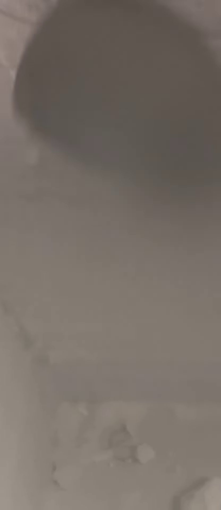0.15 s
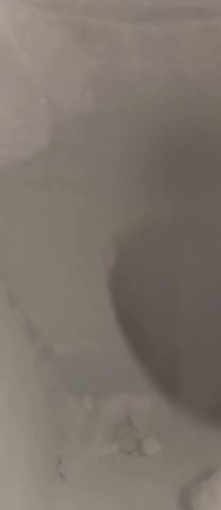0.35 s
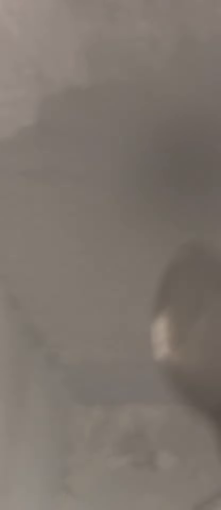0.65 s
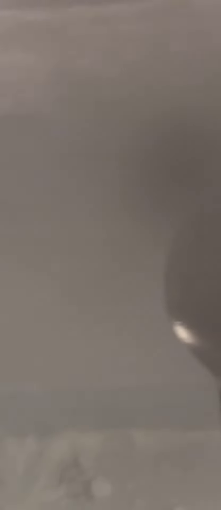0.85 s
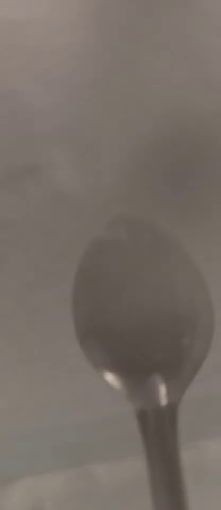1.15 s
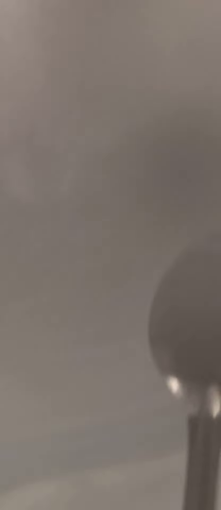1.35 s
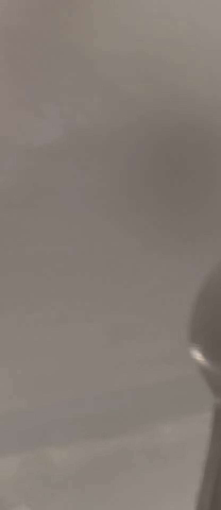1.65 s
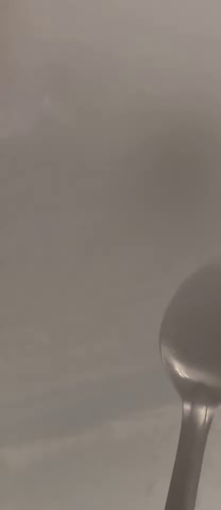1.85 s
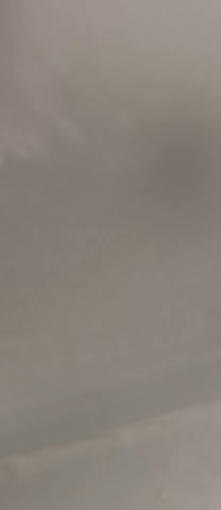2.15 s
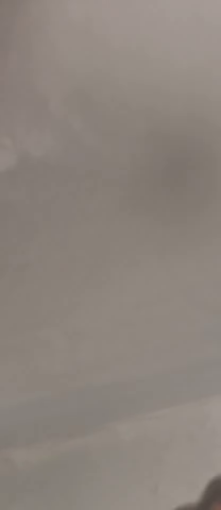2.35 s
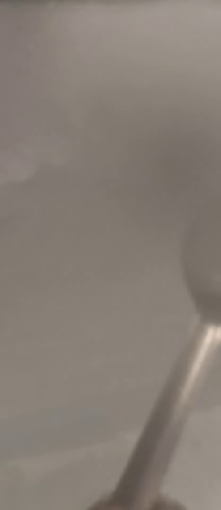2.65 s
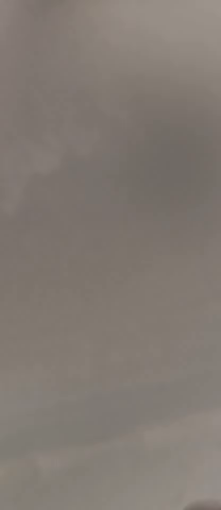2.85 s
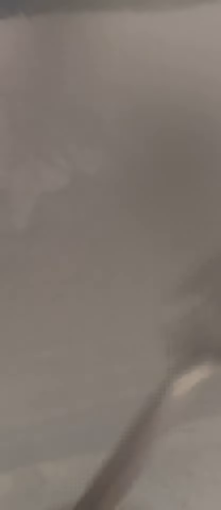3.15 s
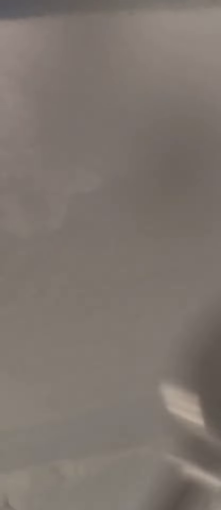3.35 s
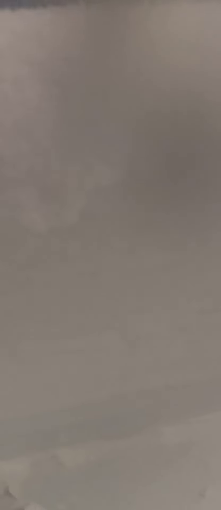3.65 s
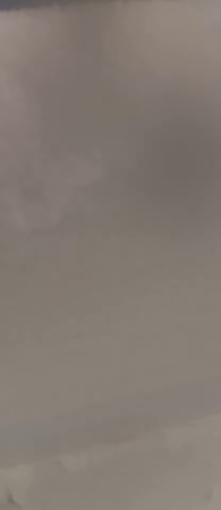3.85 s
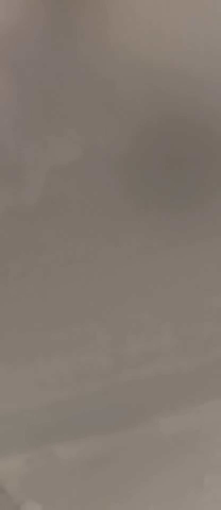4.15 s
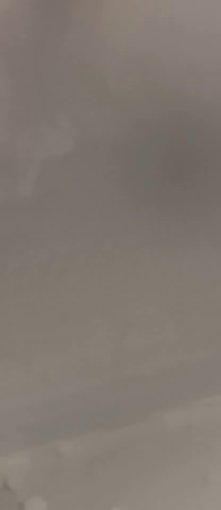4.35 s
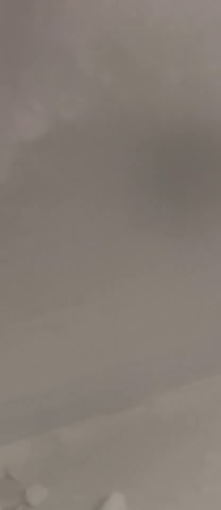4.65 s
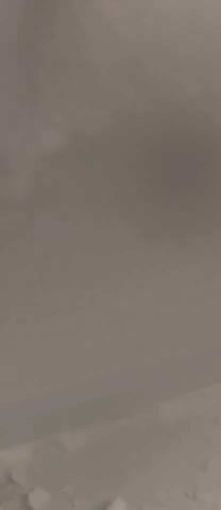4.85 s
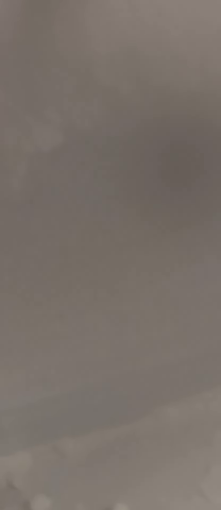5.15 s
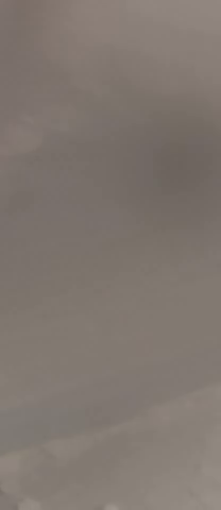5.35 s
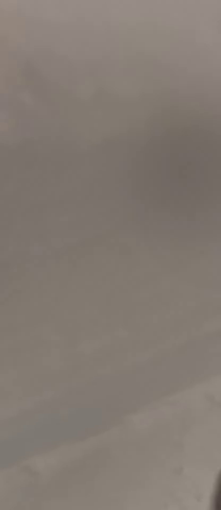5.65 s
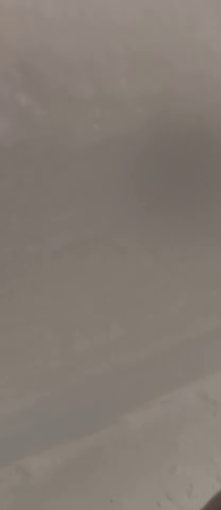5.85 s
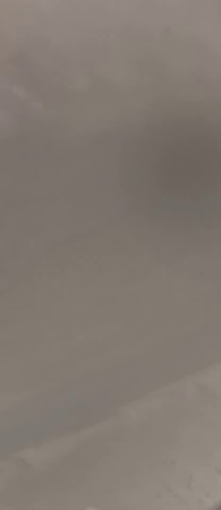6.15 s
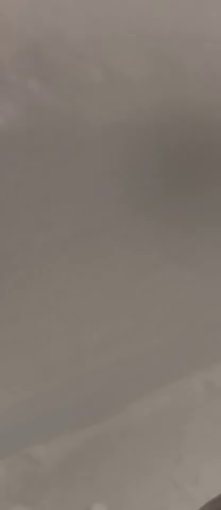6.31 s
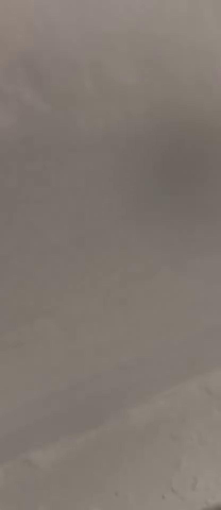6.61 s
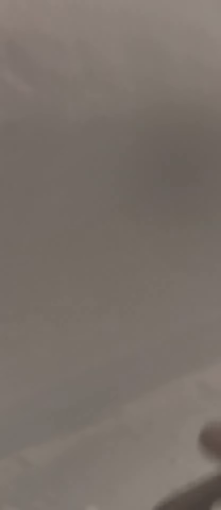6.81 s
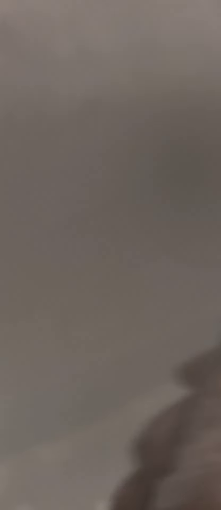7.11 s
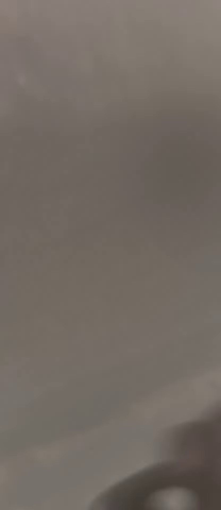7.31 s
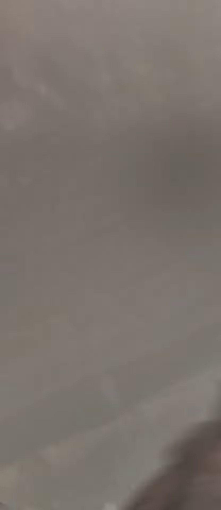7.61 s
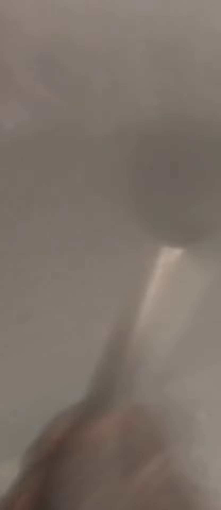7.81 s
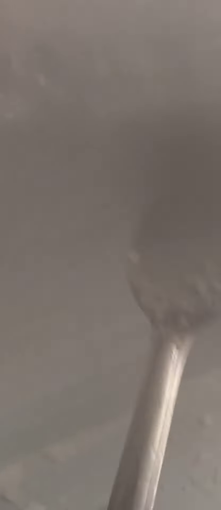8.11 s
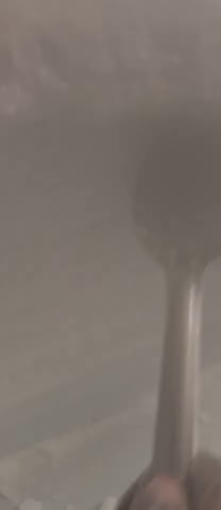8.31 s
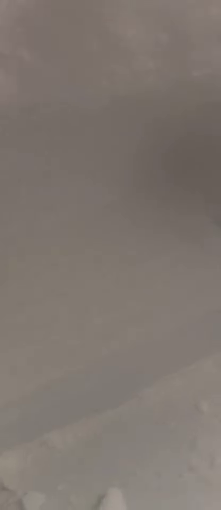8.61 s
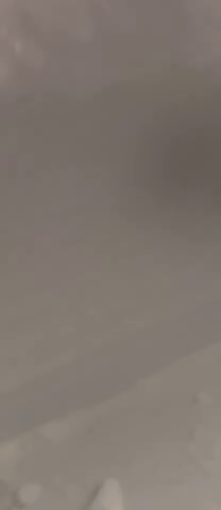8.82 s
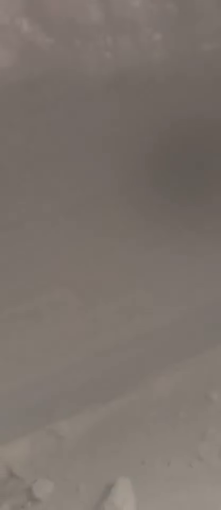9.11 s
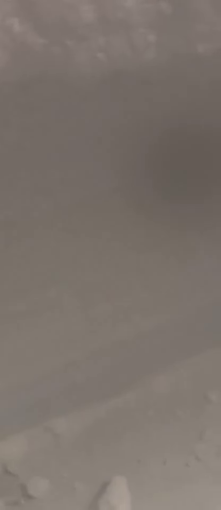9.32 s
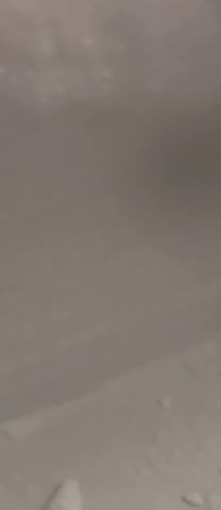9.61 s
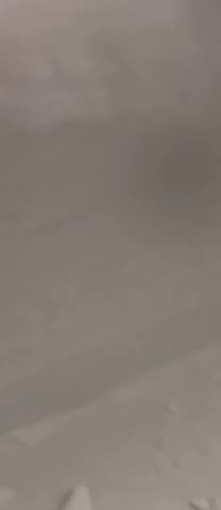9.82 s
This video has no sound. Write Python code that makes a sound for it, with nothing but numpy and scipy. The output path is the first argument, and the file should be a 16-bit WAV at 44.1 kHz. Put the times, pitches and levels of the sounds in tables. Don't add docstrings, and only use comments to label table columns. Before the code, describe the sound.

A metal spoon chops and scrapes thick frost inside a humming freezer, with boomy knocks, brittle ice crunches and thin singing rasps.

```python
import sys
import numpy as np
from scipy import signal
from scipy.fft import rfft, irfft, next_fast_len
from scipy.io import wavfile
from scipy.ndimage import uniform_filter1d

SR = 44100
rng = np.random.default_rng(int(sys.argv[2]) if len(sys.argv) > 2 else 0)


def undo_db(level):
    steps = np.asarray(level, float) / 20
    return 10 ** steps


def digitize_waveform(pressure):
    field = np.atleast_2d(pressure).T
    bounded = np.clip(field, -1, 1)
    quanta = np.round(bounded * 32767).astype(np.int16)
    wavfile.write(sys.argv[1], SR, quanta)


N = 439677

# (frequency [Hz], likeness [0-1])
LIKENESS = [(60, 0.96), (130, 0.94), (290, 0.89), (640, 0.07), (1410, 0), (3100, 0.11), (6820, 0),
            (15000, 0.03)]
# (frequency [Hz], level [dB], t60 [s])
CABINET = [(73.6, 1, 0.39), (110.6, 7, 0.36), (162.6, -1, 1), (179.2, -1, 0.77), (235, -11, 0.75),
           (260.4, 0.5, 0.74), (289, 7, 0.46), (350, -7, 1), (364.8, -15.5, 0.28), (464.6, -15.5, 0.42),
           (519, -17, 0.28), (612, -9.5, 0.13), (698, -21, 0.81), (965, -14.5, 0.11), (1310, 10.5, 0.039)]
# (frequency [Hz], width [Hz], level [dB])
SPOON = [
    [(3810, 38, 0)],
    [(5235, 30, 0), (7620, 45, -4), (8820, 50, -6), (10860, 80, -4), (12000, 70, -10), (13400, 55, -9)],
    [(6125, 50, 0.5), (8265, 110, -6), (10800, 70, -7), (12700, 120, -13), (14100, 60, -11)],
]


def level(x, db):
    return x * undo_db(db) / np.sqrt(np.mean(x ** 2))


def on_log(hz, table):
    f, v = np.transpose(table)[:2]
    return np.interp(np.log(np.maximum(hz, 1)), np.log(f), v)


def shaped(x, gain):
    size = next_fast_len(x.shape[-1])
    hz = np.arange(size // 2 + 1) * SR / size
    return irfft(rfft(x, size) * gain(hz), size)[..., :x.shape[-1]]


def hump(hz, octaves):
    return lambda f: np.exp(-.5 * (np.log2(np.maximum(f, 1) / hz) / octaves) ** 2)


def ring(x, hz, t60):
    r = np.exp(-np.log(1000) / (max(t60, .005) * SR))
    w = 2 * np.pi * hz / SR
    return signal.lfilter([.5, 0, -.5], [1, -2 * r * np.cos(w), r * r], x)


def walk(rate):
    hold = int(SR / rate)
    steps = np.repeat(rng.standard_normal(N // hold + 1), hold)
    return 1.38 * uniform_filter1d(uniform_filter1d(steps, hold), hold)[:N]


def pair(likeness):
    mid, side = rng.standard_normal((2, N))
    mid = shaped(mid, lambda f: np.sqrt(1 + np.clip(on_log(f, likeness), 0, 1)))
    side = shaped(side, lambda f: np.sqrt(1 - np.clip(on_log(f, likeness), 0, 1)))
    return np.array([mid + side, mid - side]) / np.sqrt(2)


def grit(scatter_db):
    grain_size = np.repeat(rng.exponential(size=N // 40 + 1), 40)[:N]
    return level(undo_db(scatter_db * grain_size) * rng.standard_normal((2, N)), 0)


def add(out, part, s):
    i = int(s * SR)
    out[:, i:i + part.shape[1]] += part[:, :N - i]


def freezer():
    # (time [s], level [dB])
    hum_gain = [(0.0, -33), (2.36, -30.5), (2.55, -34.5), (2.94, -36.5), (3.05, -36), (3.27, -43),
                (3.97, -43.5), (4.3, -41.5), (4.5, -36.5), (5.41, -37.5), (5.89, -33.5), (6.08, -40),
                (6.78, -41), (7.33, -38), (8.63, -37.5), (9.97, -31)]
    # (frequency [Hz], level [dB], wobble [dB], left minus right [dB])
    tones = [(59.9, -36, 5, -3.5), (102, -27.5, 0, 1.5), (113.2, -28, 1, -1), (202.4, -44.5, 3, 22),
             (226.2, -22.5, 0.53, 1.1), (298, -43.5, -1.5, -23), (339.7, -34.5, 1.5, -4),
             (556.5, -48.5, 4, 15), (709.5, -44.5, 4, 8.5), (775, -46, 2.5, 6), (831, -46, -1, 2.5)]
    # (frequency [Hz], density [dB per Hz])
    air_curve = [(15, -37), (25, -11.5), (102, -5.5), (141, -12.5), (190, -15.5), (223, -5.5), (256, -12),
                 (344, -11.5), (394, -14), (1330, -21), (1700, -23), (7710, -38.5), (9840, -42),
                 (13600, -43), (16000, -41)]
    # (frequency [Hz], width [Hz], level [dB])
    whines = [(5100, 40, -62), (7800, 50, -62), (13600, 70, -61), (15000, 70, -65)]
    t = np.arange(N) / SR
    air = pair(LIKENESS)
    out = level(shaped(air, lambda f: undo_db(on_log(f, air_curve))), -23) * undo_db(0.33 * walk(7.5))
    cavity = sum(undo_db(db) * ring(air, hz, t60) for hz, db, t60 in CABINET)
    out += level(cavity, -33)
    for hz, width, db in whines:
        out += level(ring(air, hz, 1.5 / width), db) * undo_db(3.5 * walk(3))
    for hz, db, wobble_db, pan_db in tones:
        phase = 2 * np.pi * (hz * t + rng.random()) + 0.3 * wobble_db * walk(3)
        sides_db = np.array([[pan_db], [-pan_db]]) / 2
        out += np.sqrt(2) * undo_db(db + wobble_db * walk(5) + sides_db) * np.sin(phase)
    s, db = np.transpose(hum_gain)
    return out * undo_db(np.interp(t, s, db) + 32.5)


def walls(x):
    # (first echoes [s], share [ratio], tail t60 [s], tail level [dB])
    echoes = (.004, 1.75, 0.37, -23)
    spread_s, share, t60, tail_db = echoes
    t = np.arange(int(.3 * SR)) / SR
    tail = shaped(rng.standard_normal((2, len(t))), hump(2500, 1.9)) / np.sqrt(SR / 100)
    reply = undo_db(tail_db - 60 * t / t60) * tail
    reply[:, 0] = 1
    for channel, lags in enumerate(rng.random((2, 6))):
        at = (1 + lags * spread_s * SR).astype(int)
        reply[channel, at] += share * (1 - 1.28 * lags) * (-1) ** np.arange(6)
    reply = reply / np.sqrt(np.sum(reply ** 2, axis=1, keepdims=True))
    return signal.oaconvolve(x, reply, axes=1)[:, :N]


def chips(grains):
    # (time [s], peak level [dB], pitch [Hz], spread [octaves])
    ticks = [(.476, -26, 7500, .2), (4.559, -27, 13000, .3), (4.583, -0.5, 4970, .15),
             (4.615, -24, 11500, .2), (4.663, -9, 6660, 0.15), (4.748, -20, 6070, .26),
             (4.808, -14, 4380, 0.93), (4.815, -17, 6950, 0.17), (4.823, -22, 6040, 0.23),
             (4.88, -23, 4900, .18), (4.931, -23, 6960, .2), (4.949, -21, 11000, .3),
             (4.954, -29, 7000, .23), (7.787, -28, 9000, .6), (8.185, -19, 1310, .1),
             (8.37, -17, 10800, 0.44)]
    out = np.zeros((2, N))
    t = np.arange(int(.08 * SR)) / SR
    envelope = np.minimum(t / 0.0011, 1) * undo_db(-60 * t / 0.023)
    for s, db, hz, octaves in ticks:
        raw = grains[:, int(s * SR):int(s * SR) + len(t)]
        add(out, level(shaped(raw, hump(hz, octaves)), db - 5.0) * envelope, s)
    return out


def slides():
    # (middle [s], hold [s], hiss [dB], ringing [dB], grip [-1 free tip, 0 bowl, 1 pressed tip])
    rubs = [(.075, .06, -41, -60, -.4), (.94, .012, -58, -40, -1), (2.535, .01, -42, -49, 1),
            (2.568, .03, -39, -48, 1.2), (3.12, .05, -50, -58, 0.72), (3.17, .04, -46, -45, -1.2),
            (3.2, 0.018, -52, -51, 1.3), (4.985, 0.0079, -52, -35.5, 0.44), (6.975, .012, -42, -46, -.3),
            (7.035, 0.014, -53, -38.5, 0.94), (7.022, 0.015, -52, -35, -1.2), (7.41, .03, -39, -48, .3),
            (7.86, 0.025, -38, -52, -.3), (7.908, .012, -42, -46, .9), (8.188, .01, -35, -39, 0.34),
            (8.278, 0.039, -35, -40.5, 0.61), (8.42, 0.033, -35, -47, .6), (8.56, 0.014, -38, -39, 1.1),
            (8.755, 0.036, -39, -37.5, -0.51), (8.855, 0.056, -40, -38.5, -0.61),
            (8.98, 0.02, -39, -37, -0.68), (9.055, 0.018, -46, -36, -0.35), (9.1, .05, -39, -36.5, -0.2)]
    attack_db_per_s, release_db_per_s, grip_fall_db = 600, 414, 12
    out = np.zeros((2, N))
    rub = grit(1.35) * undo_db(2.5 * walk(70))
    t = np.arange(-.08, .12, 1 / SR)
    fade = np.minimum(np.minimum(t - t[0], t[-1] - t) / .01, 1)
    for s, hold_s, hiss_db, ring_db, grip in rubs:
        start = max(s + t[0], 0)
        raw = rub[:, int(start * SR):][:, :len(t)]
        part = level(shaped(raw, hump(9300, 0.75)), hiss_db)
        for place, modes in zip((0, 1, -1), SPOON):
            db = ring_db - grip_fall_db * (grip - place) ** 2
            part = part + sum(level(ring(raw, f, 2.2 / w), db + g) for f, w, g in modes)
        attack_db = (t + hold_s / 2) * attack_db_per_s
        release_db = (hold_s / 2 - t) * release_db_per_s
        stroke_db = np.minimum(0, np.minimum(attack_db, release_db))
        add(out, part * undo_db(stroke_db) * fade, start)
    return out


def cracks(grains):
    # (time [s], peak level [dB], centre [Hz], t60 [s], swell [s])
    breaks = [(2.515, -5, 7900, 0.037, .004), (3.0365, -7.5, 6500, 0.01, 0.0042),
              (4.31, .5, 7940, 0.073, 0.01), (4.583, -9, 5000, 0.094, .0009),
              (5.855, 2, 3120, 0.061, 0.00046), (5.959, 1, 9050, .022, 0.0071),
              (6.945, -5.5, 9300, 0.039, 0.0009), (7.369, 5, 9800, 0.013, 0.0023),
              (7.587, -3.5, 5840, 0.032, 0.00127), (7.805, -2.5, 8000, 0.054, 0.0039),
              (8.381, -8.5, 5770, 0.1, 0.00096)]
    # (time [s], peak level [dB], dull part [dB], centre [Hz], t60 [s])
    crunches = [(4.325, -4, -17, 9000, 0.078), (4.338, -12, -6, 9000, 0.043), (4.854, -23, -8, 9900, 0.29),
                (5.875, -13.5, -0.5, 2900, 0.42), (6.96, -12, -20, 6050, 0.027),
                (7.382, -17, 3, 6950, 0.068), (7.594, -23, 15, 4000, 0.086), (7.822, -24, -12, 5030, .13),
                (8.404, -20, 9, 4500, 0.063), (9.593, -11, -12, 11000, .03)]
    # (time [s], peak level [dB], centre [Hz])
    flakes = [(.492, -17, 11000), (3.651, -25.5, 12000), (3.684, -32, 11000), (4.355, -27, 10000),
              (4.576, -16, 12000), (4.663, -13, 8900), (4.879, -16, 6500), (4.974, -14, 6860),
              (6.097, -27, 11000), (6.187, -27, 9000), (6.282, -28, 9000), (8.185, -18, 8000),
              (8.676, -23, 8000)]
    rows = [(s, db, -2.5, hz, t60, swell_s) for s, db, hz, t60, swell_s in breaks]
    rows += [(*row, .006) for row in crunches]
    rows += [(s, db, -8, hz, 0.047, 0.0024) for s, db, hz in flakes]
    out = np.zeros((2, N))
    for s, db, dull_db, hz, t60, swell_s in rows:
        t = np.arange(int((2.1 * t60 + 0.063) * SR)) / SR
        raw = grains[:, int(s * SR):int(s * SR) + len(t)]
        swell = np.minimum(t / swell_s, 1) ** 2
        after = np.maximum(t - swell_s, 0) / t60
        bright = level(shaped(raw, hump(hz, 0.88)), 0) * swell * undo_db(-60 * after)
        dull = level(shaped(raw, hump(1390, 1.0)), dull_db) * swell * undo_db(-60 * after / 2.4)
        ping = sum(undo_db(g) * ring(bright, f, 1.3 / w) for f, w, g in sum(SPOON, []))
        add(out, undo_db(db - 10) * (bright + dull + undo_db(-41.5) * ping), s - swell_s)
    return out


def blows():
    # (time [s], panel mode peak [dB], arm weight [dB], side wall [dB], spoon edge [dB])
    strikes = [(2.517, -3, .3, -8, -21), (3.037, 1.3, -7.5, -13, -12.5), (3.069, -13.5, -10, 5, -17),
               (3.655, -15, -4.5, -5, -23), (4.311, -4.5, -1.2, -14, -8), (4.344, -9.5, 4, -10, 0.5),
               (4.583, -13.5, -15, -4, 3), (5.003, -18.5, 0, -12, -9), (5.875, -18, 2, 1, 13.5),
               (5.967, -2, -4, -6.5, -6), (6.954, -10, 5, -10, -5), (7.03, -16, -5, -15, -13),
               (7.371, -1, -6, -9.5, -7), (7.591, -5, -12, -14, 1.5), (7.808, -6, -2, 1, -3),
               (7.833, -17, 8, 9.5, 5), (8.19, -30, 15, 12, 8), (8.389, -4.5, -24, -8, -19),
               (8.403, -10, -7.5, -23, -6), (8.5, -34, 12, -8, -9), (8.704, -26, 6.5, -8, -24)]
    boom_db, thump_db = 0.2, 1.3
    edges = 0, 90, 140, 240, 330, 1100
    out = np.zeros((2, N))
    judder = shaped(pair(LIKENESS), lambda f: 1 / (1 + (f / 900) ** 4))
    t = np.arange(int(.35 * SR)) / SR
    shove = np.minimum(t / 0.0018, 1) * np.exp(-(t / 0.017) ** 2)
    damping = undo_db(-61 * t)
    for s, db, weight_db, side_db, edge_db in strikes:
        shares_db = boom_db + weight_db, thump_db + weight_db, side_db, 0, edge_db
        push = shove * judder[:, int(s * SR):][:, :len(t)]
        for lo, hi, share_db in zip(edges, edges[1:], shares_db):
            modes = [(g, ring(push, hz, t60)) for hz, g, t60 in CABINET if lo < hz < hi]
            boom = damping * sum(undo_db(g) * m / np.abs(m).max() for g, m in modes)
            add(out, boom * undo_db(db + share_db) / np.abs(boom).max(), s - .003)
    return out


def scene():
    ice = walls(cracks(grit(0.84)) + chips(grit(1.7)))
    return freezer() + blows() + ice + slides()


def band_limit(x):
    return signal.sosfilt(signal.butter(12, 16230, fs=SR, output="sos"), x)


def record(dry):
    x = signal.sosfilt(signal.butter(3, 42, "high", fs=SR, output="sos"), dry)
    x = shaped(x, lambda f: 1 - 0.5 * hump(9750, .06)(f))
    x = shaped(np.clip(x, -1, 1), lambda f: 1 / (1 + (f / 15750) ** 70))
    return band_limit(x)


dry = scene()
out = record(dry)
digitize_waveform(out)
```